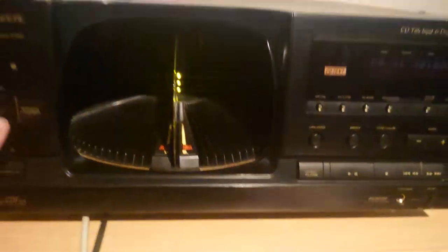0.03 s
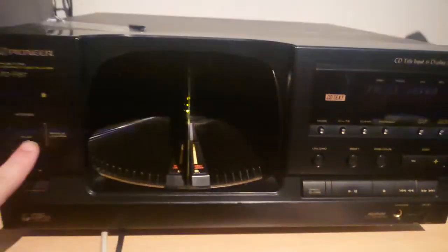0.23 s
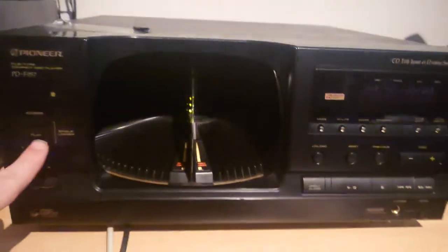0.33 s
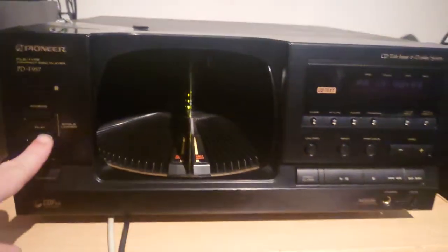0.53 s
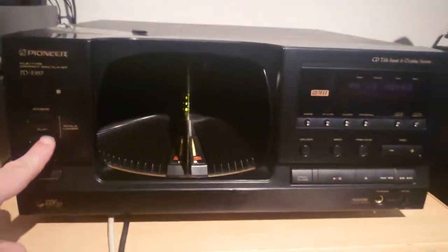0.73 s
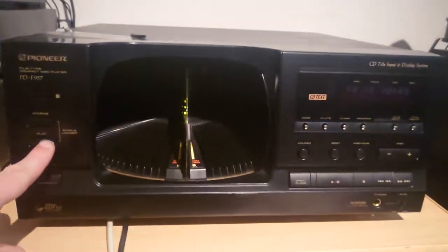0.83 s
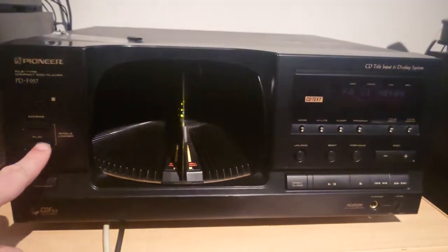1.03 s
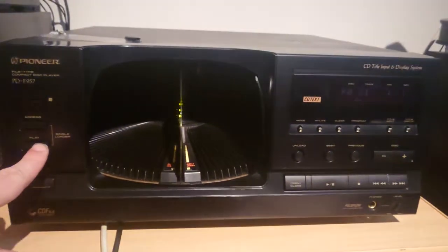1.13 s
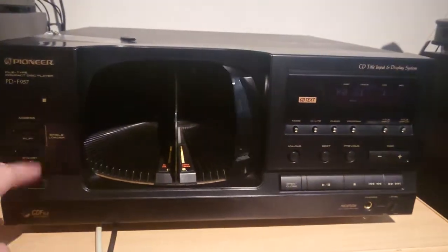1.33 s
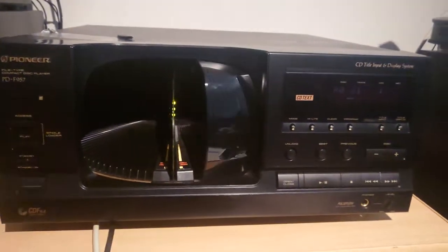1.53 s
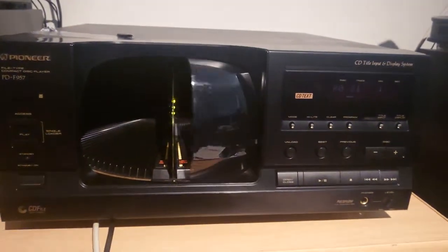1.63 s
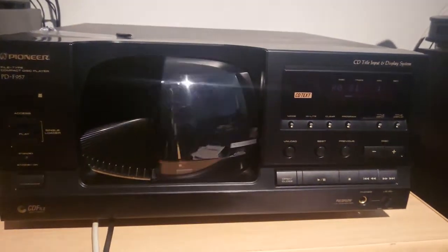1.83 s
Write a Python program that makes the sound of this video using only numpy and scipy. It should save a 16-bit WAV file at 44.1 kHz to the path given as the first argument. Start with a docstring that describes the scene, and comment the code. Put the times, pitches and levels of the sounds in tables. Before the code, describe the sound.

Close by in a room, a disc changer gives a sharp click and a few lighter clacks, then its gears whir softly as the door slides open. A much louder, low handling thud on the microphone comes beforehand, over faint rumble.

```python
"""A disc changer opens its door.

The changer stands on a desk near a hand-held camera with two microphones. A handling bump thuds on
the right one, over rumble and rush. Impacts excite the mechanism's modes as it clacks into gear, and a
small motor slides the plastic door open: meshing teeth rattle and friction makes the cabinet resonate,
mostly on the left."""
import sys
import numpy as np
from scipy import signal
from scipy.fft import rfft, irfft, next_fast_len
from scipy.io import wavfile
from scipy.ndimage import map_coordinates

SR = 44100
rng = np.random.default_rng(int(sys.argv[2]) if len(sys.argv) > 2 else 0)


def store_pcm(level_fs):
    """Save levels as 16-bit WAV."""
    pcm = np.round(np.clip(level_fs, -1, 1) * 32767).astype(np.int16)
    wavfile.write(sys.argv[1], SR, np.atleast_2d(pcm).T)


N = 83790

# background spectra: left floor, right rush, right rumble (frequency [Hz], relative density [dB])
FLOOR_SPECTRUM = [(20, -26), (50, -3.5), (100, -1.5), (155, -11.5), (240, -9.5), (400, -32), (900, -35.5),
                  (2000, -36.5), (4000, -40.5), (7500, -50), (9800, -50), (10150, -31.5), (10500, -43),
                  (15000, -39)]
RUSH_SPECTRUM = [(150, -10.5), (235, -15), (330, -18), (480, -13), (600, -0.5), (690, 1.5), (850, -7),
                 (1100, -7), (1380, -20.5), (1600, -11.5), (1850, -9), (2100, -14.5), (2500, -28.5),
                 (4500, -33.5), (7500, -45), (11000, -38.5), (15000, -32.5)]
RUMBLE_SPECTRUM = [(18, -59.5), (28, -21), (44, 0.5), (65, 2), (82, -5), (100, -12.5), (170, -35),
                   (330, -49), (700, -81.5)]
# swell of the rumble (time [s], level [dB])
RUMBLE_ENVELOPE = [(0, -54.5), (0.102, -55.5), (.14, -45), (.3, -47.5), (.39, -51), (0.428, -46.5),
                   (0.532, -53.5), (.8, -50), (1.111, -53.5), (1.148, -44), (1.22, -48.5), (1.33, -47),
                   (1.381, -56.5), (1.649, -51.5), (1.9, -53)]
# modes of the camera body (frequency [Hz], level re thud [dB], T60 [s])
CAMERA_MODES = [(280, -56, 0.3), (458, -54, 0.18)]
# spectra of motor drone, motor fizz and gear rattle (frequency [Hz], relative density [dB])
DRONE_SPECTRUM = [(20, -47), (35, -16), (50, 3.5), (70, -4.5), (115, -6), (155, -10), (220, -17),
                  (400, -22), (900, -62)]
FIZZ_SPECTRUM = [(6000, -27), (8800, -35), (9600, -1), (10200, 6), (11000, 3.5), (11700, -3.5), (15000, -4)]
GEAR_SPECTRUM = [(150, -17), (450, 1), (900, 2), (1500, -8), (2600, -14.5), (3300, -7.5), (4300, -19.5),
                 (5500, -15.5), (6800, -49), (9000, -45), (15000, -51)]
# resonances of the gear train and of cabinet and door (frequency [Hz], bandwidth [Hz], gain [dB])
GEAR_MODES = [(1370, 83, -3), (1687, 36, 0.5), (1928, 37, 1), (2360, 120, -5), (2542, 57, -0.5),
              (2917, 34, -2), (3400, 51, -18.5), (4000, 81, -6.5), (4630, 100, -19.5)]
CABINET_MODES = [(223, 18.6, 5), (305.5, 26, -2.5), (408, 33, -4.5), (522, 28.6, 2), (569.6, 30.3, 1.5),
                 (711, 47, -15), (841, 48, -6.5), (1083, 24, -17.5)]
# tones of the gear train (frequency [Hz], level re rattle [dB])
GEAR_TONES = [(1380, -16), (1700, -16.5), (2520, -19.5)]
# load on the drive (time [s], gear level [dB], door level [dB])
DRIVE_LOAD = [(1.135, -69, -52), (1.18, -66.5, -68.5), (1.255, -67.5, -64), (1.29, -70, -60),
              (1.331, -65.5, -59), (1.356, -68, -67.5), (1.41, -70.5, -70.5), (1.482, -70.5, -67),
              (1.52, -72, -83), (1.575, -73, -83), (1.594, -79, -58.5), (1.609, -68, -64),
              (1.626, -70.5, -57), (1.68, -71.5, -59.5), (1.711, -70, -65.5), (1.775, -73.5, -74),
              (1.81, -71, -71), (1.83, -69, -69), (1.9, -70, -63)]
# impacts in the mechanism (time [s], level [dB], rise [s], T60 [s], treble gain [dB],
# low mode [Hz], its level re burst [dB], high mode [Hz], its level re burst [dB])
IMPACTS = [(1.1923, -51, 0.0045, 0.075, -7, 900, 0.5, 3480, -9.5),
           (1.265, -61.5, 0.0032, 0.076, 9, 2014, -2, 4420, -2),
           (1.2793, -52.5, 0.00036, .045, -12, 1975, -1, 2190, -8),
           (1.364, -61, 0.0077, 0.14, -23, 1376, -3, 1592, 3.5),
           (1.3729, -55, 0.0016, 0.064, -14, 1667, 2, 5380, -15.5),
           (1.591, -71, 0.00027, 0.03, -22, 610, 0, 810, 10),
           (1.6211, -63, 0.00025, 0.066, -13, 2290, 2, 3990, -4.5),
           (1.637, -63, 0.0012, 0.067, -10, 2330, 2.5, 10050, -10),
           (1.647, -66.5, 0.00088, 0.091, -18, 1118, 0, 4070, -4),
           (1.674, -67, .003, 0.062, -15, 1200, -4, 2310, 6),
           (1.821, -61, 0.00028, 0.078, -22, 587, 5, 1350, -4)]
# spectrum of an impact's noise burst (frequency [Hz], relative density [dB])
IMPACT_SPECTRUM = [(150, -22), (500, -16), (800, 1.5), (1100, -1.5), (1600, 4), (2500, 2), (3350, -3.5),
                   (3850, -7.5), (4900, -4.5), (6200, -22), (8300, -34.5), (10200, -17), (12600, -22.5),
                   (15000, -30)]
# modes of the latch (frequency [Hz], relative level [dB], T60 [s])
LATCH_MODES = [(819, -6, 0.088), (1243, -9, 0.057), (1410, -12, 0.065), (1668, 4.5, 0.054),
               (1790, -8, .045), (2140, -7, 0.054), (2520, -6, 0.057), (3020, -7, 0.031), (3310, -4, 0.065),
               (4730, -15, 0.036), (5350, -14, 0.029), (10150, -16, 0.027), (12100, -19, 0.045)]
# extra treble of the latch's crack (frequency [Hz], relative gain [dB])
CRACK_TREBLE = [(2000, 2), (4500, 1.5), (9000, 3.5)]
# transfer from the machine to the right microphone (frequency [Hz], gain [dB])
RIGHT_TRANSFER = [(100, -16.5), (500, -24), (2000, -22), (5000, -44), (11000, -30)]


def amp(db):
    """Amplitude ratio of a level in decibels."""
    return 10 ** (np.asarray(db) / 20)


def unit(x):
    """Normalisation to rms 1."""
    return x / np.sqrt(np.mean(x ** 2) + 1e-20)


def since(onset):
    """Seconds elapsed since an onset, zero before it."""
    return np.maximum(np.arange(N) / SR - onset, 0)


def gain_at(curve, hz):
    """Gain from a decibel curve interpolated over log frequency."""
    knots_hz, db = np.transpose(curve)
    return amp(np.interp(np.log(hz + 1), np.log(knots_hz + 1), db))


def filtered(x, response):
    """Linear filtering: the spectrum is multiplied by a frequency response."""
    size = next_fast_len(N + SR // 2)
    return irfft(rfft(x, size) * response(np.fft.rfftfreq(size, 1 / SR)), size)[..., :N]


def coloured(x, spectrum):
    """Spectral shaping, at rms 1."""
    return unit(filtered(x, lambda hz: gain_at(spectrum, hz)))


def noise(spectrum):
    """Coloured Gaussian noise of rms 1."""
    return coloured(rng.standard_normal(N), spectrum)


def wobble(knots_per_s):
    """Smooth random modulation: a spline through Gaussian values."""
    knots = rng.standard_normal(int(N * knots_per_s / SR) + 4)
    return map_coordinates(knots, [np.arange(N) * knots_per_s / SR])


def tone(hz, waver_rad=0.8, waver_db=2.5, knots_per_s=45):
    """Random phase and amplitude modulation make a sinusoid waver; rms 1."""
    phase = 2 * np.pi * hz * since(0) + waver_rad * wobble(knots_per_s)
    return unit(np.sin(phase) * amp(waver_db * wobble(knots_per_s)))


def resonate(x, modes):
    """Forced vibration: x drives second-order resonators of alternating polarity; rms 1."""
    def response(hz):
        return sum((-1) ** k * amp(db) * 1j * hz * width / (centre ** 2 - hz ** 2 + 1j * hz * width)
                   for k, (centre, width, db) in enumerate(modes))
    return unit(filtered(x, response))


def struck(modes, t):
    """Free vibration: a sum of damped modes, t seconds after a blow."""
    return sum((-1) ** k * amp(db - 60 * t / t60) * np.sin(2 * np.pi * hz * t)
               for k, (hz, db, t60) in enumerate(modes))


def strike(t, rise_s, t60):
    """Envelope of an impact: quick growth, then exponential decay."""
    return (1 - np.exp(-t / rise_s)) * amp(-60 * t / t60)


def diffuse(x, t60):
    """Diffuse decay: convolution with a fresh tail of dying noise of unit energy."""
    t = np.arange(SR // 2) / SR
    tail = rng.standard_normal(len(t)) * amp(-60 * t / t60)
    return signal.fftconvolve(x, tail / np.linalg.norm(tail))[:N]


def background():
    """Uncorrelated noises: a faint floor on the left, a swelling rumble and steady rush on the right."""
    rumble = amp(np.interp(since(0), *np.transpose(RUMBLE_ENVELOPE))) * noise(RUMBLE_SPECTRUM)
    floor = amp(-72.5) * noise(FLOOR_SPECTRUM)
    rush = amp(-70.5) * noise(RUSH_SPECTRUM)
    return np.array([floor, rumble + rush])


def bump(start_hz=109.7, end_hz=59.4, sag_s=0.013, cutoff_hz=190):
    """Structure-borne sound: a soft knock on the camera gives a thud of sagging pitch and faint rings."""
    t = since(0.2045)
    pitch_hz = end_hz + (start_hz - end_hz) * np.exp(-t / sag_s)
    phase = 2 * np.pi * np.cumsum(pitch_hz * (t > 0)) / SR
    thud = -strike(t, rise_s=0.01, t60=0.13) * np.sin(phase)
    soft_thud = filtered(thud, lambda hz: 1 / np.hypot(1, (hz / cutoff_hz) ** 2))
    return amp(-14) * (soft_thud + struck(CAMERA_MODES, t))


def motor(mesh, running_s):
    """Motor noise in two bands: a low drone and a high fizz, each growing linearly in decibels."""
    drone = amp(-65.5 + 1.5 * running_s) * noise(DRONE_SPECTRUM)
    fizz = amp(-86.5 + 7 * running_s) * coloured(mesh + rng.standard_normal(N), FIZZ_SPECTRUM)
    return drone + fizz


def teeth(count=700, mesh_hz=273, jitter_periods=0.15, scatter_db=2):
    """Gear meshing: a quasi-periodic train of knocks, damped by the plastic, with scraping between."""
    jitter, strength = rng.standard_normal((count, 2)).T
    times = (np.arange(count) + 1 + jitter_periods * jitter) / mesh_hz
    samples = np.round(times * SR).astype(int)
    impulses = np.bincount(np.abs(samples), amp(scatter_db * np.clip(strength, -2, 2)), N)[:N]
    knocks = unit(diffuse(impulses - impulses.mean(), t60=0.008))
    scrape = amp(-2) * rng.standard_normal(N)
    return (knocks + scrape) * amp(0.5 * wobble(knots_per_s=47))


def gears(mesh):
    """Tooth forces excite the gear train's resonances; wavering tones add a whine."""
    rattle = unit(coloured(mesh, GEAR_SPECTRUM) + amp(-0.5) * resonate(mesh, GEAR_MODES))
    whine = sum(amp(db) * tone(hz) for hz, db in GEAR_TONES)
    return unit(rattle + whine)


def door(groan_hz=518):
    """Sliding friction drives the modes of door and cabinet, with one groaning tone."""
    friction = rng.standard_normal(N)
    rub = coloured(resonate(friction, CABINET_MODES), [(1200, 1), (4000, -18)])  # treble roll-off
    return unit(rub + amp(-5.5) * tone(groan_hz))


def drive(start_s=1.133, spin_up_s=0.03):
    """Superposition of gears, door and motor, fading in at start-up; gears and door follow the load."""
    times, gear_db, door_db = np.transpose(DRIVE_LOAD)
    t, running_s = since(0), since(start_s)
    mesh = teeth()
    rattling = amp(np.interp(t, times, gear_db)) * gears(mesh)
    rubbing = amp(np.interp(t, times, door_db)) * door()
    fade_in = 1 - np.exp(-running_s / spin_up_s)
    return fade_in * (rattling + rubbing + motor(mesh, running_s))


def clacks(treble_from_hz=1100, treble_full_hz=9100):
    """Impact excitation: plastic parts snap into place, each with a noise burst and two damped modes."""
    out = np.zeros(N)
    for onset, db, rise_s, t60, treble_db, low_hz, low_db, high_hz, high_db in IMPACTS:
        t = since(onset)
        burst = coloured(noise(IMPACT_SPECTRUM), [(treble_from_hz, 0), (treble_full_hz, treble_db)])
        low_mode = amp(low_db) * np.sin(2 * np.pi * low_hz * t)
        high_mode = amp(high_db) * np.sin(2 * np.pi * high_hz * t)
        out += amp(db) * strike(t, rise_s, t60) * (burst + low_mode + high_mode)
    return out


def latch(onset_s=1.1343, chatter_s=0.0045, crack_t60=0.048):
    """The first, sharpest impact: parts chatter briefly, then a broadband crack and modes decay freely."""
    t = since(onset_s)
    ring = amp(-55.5) * struck(LATCH_MODES, t)
    burst = coloured(noise(IMPACT_SPECTRUM), CRACK_TREBLE)
    crack = amp(-51.5) * strike(t, rise_s=0.00027, t60=crack_t60) * burst
    chatter_gain = amp(60 * np.minimum(t, chatter_s) / crack_t60)  # delays the crack's decay
    return chatter_gain * (ring + crack)


def scene(right_lag_s=0.00036):
    """Time and level differences: the machine is earlier and louder on the left; the bump is right."""
    machine = latch() + clacks() + drive()
    # each microphone receives its own room reverberation
    left, far = (machine + amp(-13) * diffuse(machine, t60=0.29) for _ in range(2))
    right = filtered(far, lambda hz: gain_at(RIGHT_TRANSFER, hz) * np.exp(-2j * np.pi * hz * right_lag_s))
    return np.array([left, right + bump()]) + background()


def record(dry, cutoff_hz=15800):
    """Band limiting: the camera passes nothing above its cutoff."""
    return filtered(dry, lambda hz: hz < cutoff_hz)


dry = scene()
out = record(dry)
store_pcm(out)
```